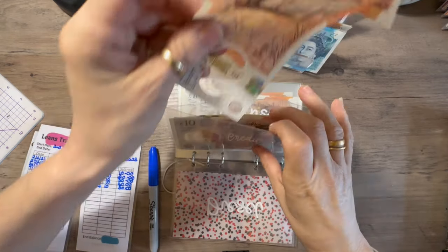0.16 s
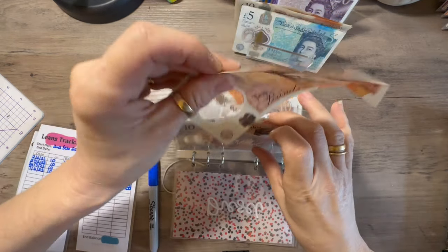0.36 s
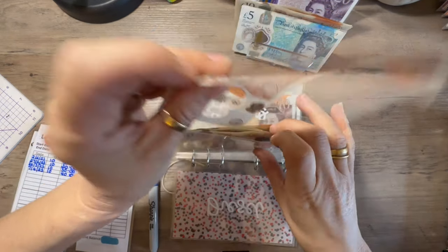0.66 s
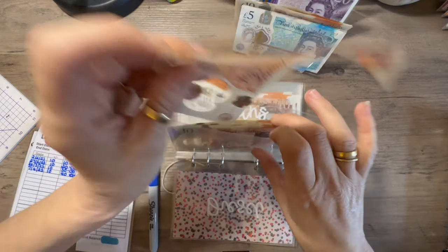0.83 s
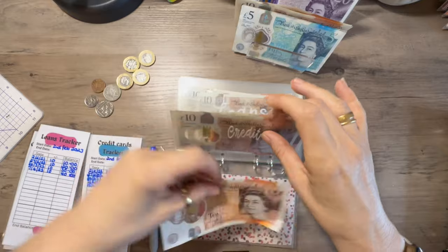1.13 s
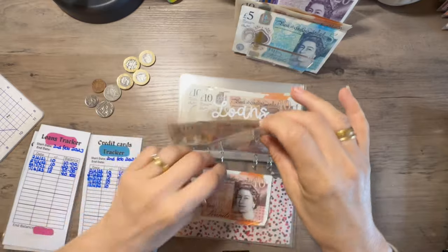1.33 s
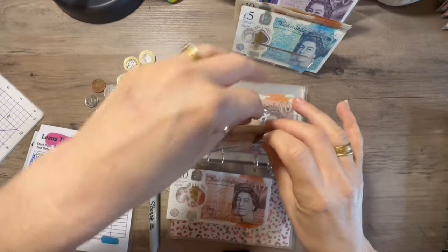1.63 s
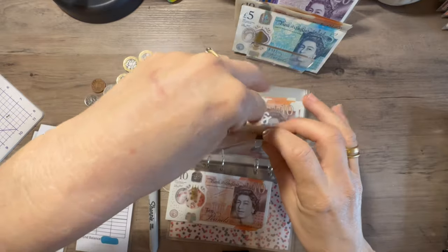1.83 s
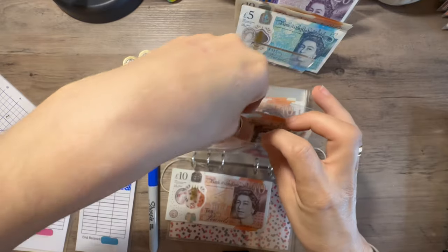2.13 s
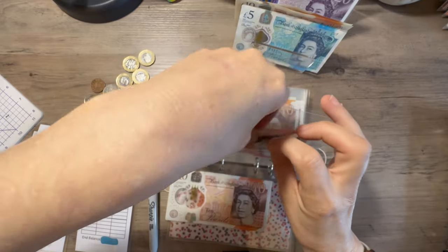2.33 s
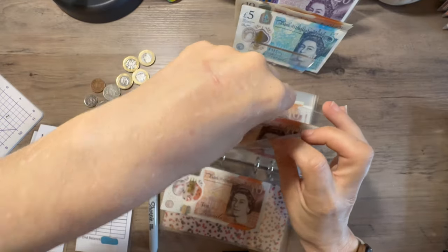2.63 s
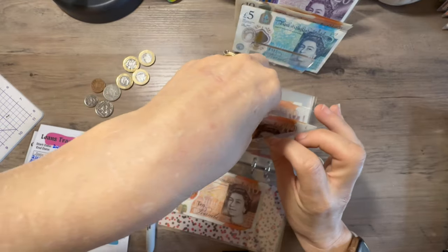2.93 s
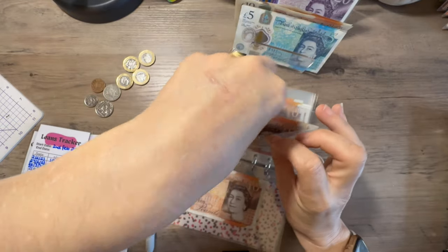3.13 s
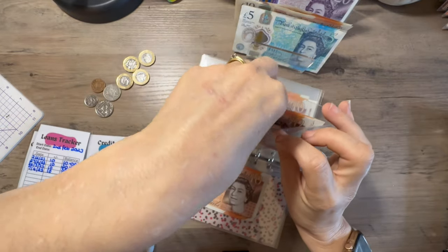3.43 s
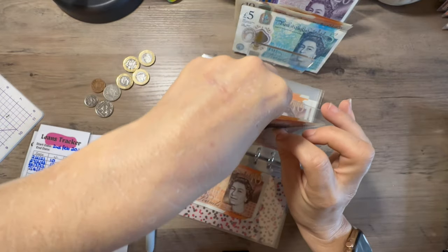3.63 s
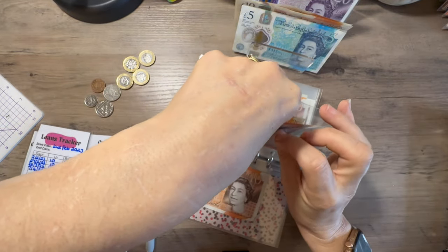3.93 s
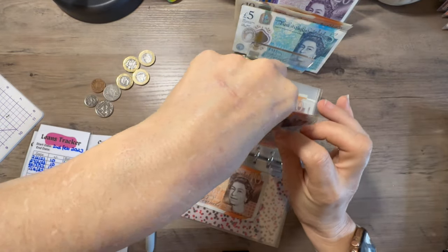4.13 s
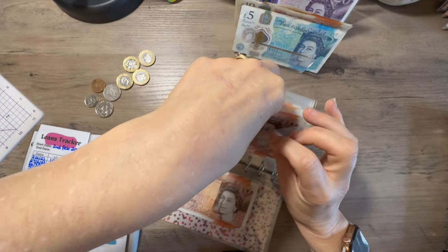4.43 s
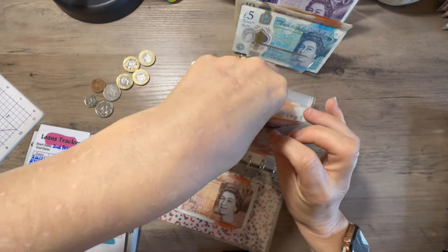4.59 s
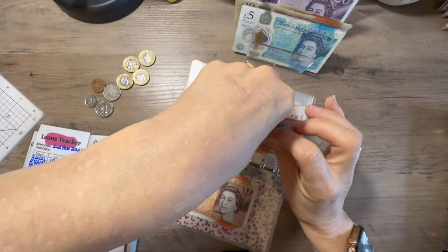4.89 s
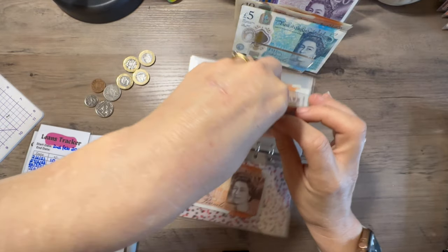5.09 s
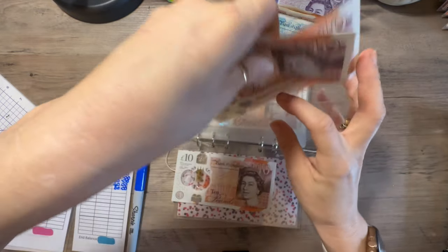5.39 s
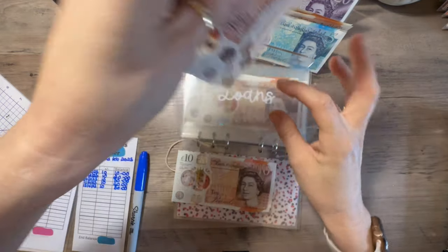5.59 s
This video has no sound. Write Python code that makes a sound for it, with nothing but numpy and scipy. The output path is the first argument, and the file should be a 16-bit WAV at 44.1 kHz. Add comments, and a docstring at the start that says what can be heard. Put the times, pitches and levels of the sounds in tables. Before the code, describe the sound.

Hands slide plastic notes from a clear pocket: soft crackly rustling, sharp little ticks, film snaps and faint low table thuds in a quiet room.

```python
"""In a small, quiet room, close to a stereo microphone, plastic banknotes are handled over a wooden table.
One is laid down, then fingers dig the next out of a clear binder pocket. Friction and buckling creases make
the film rustle; filtered noise bursts make its snaps, its crumpling and the ticks of nails and notes on the
binder. Taps run through the table top as a bending wave whose lows arrive late; low thuds are damped
swings. A faint hum wavers in the background noise."""
import sys
import numpy as np
from scipy import signal
from scipy.fft import rfft, irfft, next_fast_len
from scipy.io import wavfile
from scipy.ndimage import uniform_filter1d

SR = 44100
rng = np.random.default_rng(int(sys.argv[2]) if len(sys.argv) > 2 else 0)


def pcm_store(signal):
    """Save signal as 16-bit PCM."""
    levels = np.round(np.clip(np.atleast_2d(signal), -1, 1) * 32767)
    wavfile.write(sys.argv[1], SR, levels.astype(np.int16).T)


N = 253575
TIME = np.arange(N) / SR   # seconds
BURST_SIZE = 8192   # samples kept for one tap, crumple or thud
BURST_TIME = np.arange(BURST_SIZE) / SR   # seconds
EVENING_SIZE = 2205   # samples (50 ms) over which grainy signals are evened out

# Strokes of film sliding on film. Each row: peak in seconds, swell in seconds, fade in seconds,
# rustle level in dB, hiss in dB above the rustle, table rumble in dB above the rustle.
STROKES = [(0.003, 0.016, 0.04, -36.5, -15, -5), (0.057, 0.064, 0.24, -47.5, -6, -1.5),
           (0.425, 0.092, 0.19, -41.5, -7.5, -13), (0.533, 0.026, 0.086, -50, 7, -26),
           (0.73, 0.012, 0.04, -55.5, -12, -4.5), (0.989, 0.21, 0.2, -55, 0.5, 1.5),
           (1.215, 0.058, 0.15, -51, 0.5, -9), (1.301, 0.078, 0.042, -57.5, 9, 8),
           (1.596, 0.018, 0.12, -57, -14, 1.5), (1.72, 0.3, 0.46, -61, -9, -1),
           (2.185, 0.15, 0.09, -52.5, -2, 1), (2.315, 0.049, 0.3, -47, -8, 1.5),
           (2.665, 0.14, 0.12, -48, -8.5, 1), (2.834, 0.028, 0.12, -47.5, -8, 0.5),
           (3.014, 0.02, .12, -42, 4.5, -15), (3.18, 0.15, 0.3, -53, -12, 0.5),
           (3.418, 0.067, 0.089, -53, -7.5, 5), (3.535, 0.048, 0.3, -50.5, -7, -1),
           (3.81, 0.086, 0.53, -58, -9, 2.5), (3.986, 0.067, 0.19, -48.5, -2, -28),
           (4.109, 0.056, 0.16, -51, 3, -3), (4.401, 0.19, 0.22, -45, -12, -4),
           (4.47, 0.09, 0.19, -53.5, 3.5, 1.5), (4.7, 0.089, 0.26, -54.5, -7, -4.5),
           (5.11, .18, 0.12, -35, -11, -4.5), (5.192, 0.079, 0.41, -42, -4.5, -2.5),
           (5.288, 0.038, 0.029, -34, 2.5, -12), (5.466, 0.12, 0.052, -48.5, 11, -18),
           (5.48, 0.059, 0.42, -53, 5.5, 0.5), (5.74, 0.15, .1, -49, -17, 5)]
STROKE_DEPTH_DB, STROKE_SHAPE = 22, 1.167   # drop over one swell or fade time; 1 = pointed, 2 = bell-shaped
# The faint stir under the strokes: at first the hands only brush about, later the digging fingers hold the
# film. Each row: rustle level in dB, hiss level in dB, table rumble level in dB.
BRUSHING_DB = (-75, -81.5, -73)
HOLDING_DB = (-65.5, -94, -73)
HOLDING_FROM_S = 2.08

# Colours of the rustle, its hiss and the rumble it drives. Each row: frequency in Hz, relative density in dB.
CRINKLE_COLOUR = [(550, 1), (780, 6.5), (1020, 1.5), (1200, 0.5), (1480, 5), (1720, -.5), (2020, 1),
                  (3300, -1), (4300, -7.5), (5500, -20)]
HISS_COLOUR = [(3000, -7.5), (4600, 1), (6200, 2), (9500, -1.5), (12000, -4), (16000, -6)]
RUMBLE_COLOUR = [(30, -21), (55, 3.5), (160, 1), (790, 4), (1350, -27)]
# Likeness of the left and right sound. Each row: frequency in Hz, correlation from 0 to 1.
LIKENESS = [(100, 0.89), (900, 0.31), (1350, 0.97), (2100, 1), (2700, 0.44), (3900, 0.92), (5500, 0.15),
            (11500, 1)]

# Small ticks of nails and note edges: rate, level relative to the effort, greatest departure either way.
TICKS_PER_S, TICKS_DB, TICKS_SPREAD_DB = 30, -2.5, 4
# Resonances of the binder on the table. Each row: frequency in Hz, width in Hz, relative gain in dB.
BINDER_MODES = [(770, 48, 5.5), (1427, 78, 9.5), (1950, 89, 5.5)]

# Snaps of film and taps on the binder. Each row: start in seconds, table knock level in dB,
# pocket ring level in dB, ring pitch in Hz, film snap level in dB, upper band edge of the snap in Hz.
TAPS = [(0.0573, -40.5, -38, 2010, -51, 6400), (0.4812, -43, -54, 800, -65, 4970),
        (0.619, -48.5, -49.5, 696, -52.5, 7640), (1.052, -56, -51.5, 1120, -55.5, 7000),
        (1.1638, -50.5, -43, 2350, -40.5, 4520), (1.187, -70, -42, 2000, -38, 5530),
        (1.23, -44.5, -47, 1790, -52, 5900), (1.3695, -38, -44.5, 1490, -57, 8500),
        (1.5159, -39.5, -43, 1440, -52.5, 4360), (1.694, -45.5, -36.5, 1850, -61, 4200),
        (1.727, -50, -44, 2100, -42.5, 7760), (2.0856, -38, -26, 1510, -42, 6740),
        (2.145, -44, -33.5, 2000, -44, 6040), (2.181, -44.5, -45.5, 1730, -66, 6900),
        (2.297, -47, -41.5, 1540, -57, 5400), (2.4363, -45.5, -46, 1920, -52, 5500),
        (2.5959, -44, -36.5, 1400, -58, 4750), (2.65, -56, -36.5, 1470, -63, 5600),
        (2.6664, -57, -33.5, 1430, -53, 6600), (2.6766, -68, -38.5, 1450, -59, 7300),
        (2.7044, -45, -38.5, 1420, -57, 6300), (3.042, -34.5, -26.5, 1400, -25.5, 11700),
        (3.079, -46, -44, 1335, -45, 9000), (3.0884, -47, -42, 765, -41, 13000),
        (3.4757, -31, -33, 2010, -47, 4380), (3.52, -51, -45.5, 1440, -61, 6000),
        (3.5399, -66, -54, 1450, -40, 14500), (3.7888, -40, -33, 1950, -41, 5740),
        (3.9385, -60, -45.5, 1460, -44, 6340), (4.0978, -34.5, -32.5, 1350, -37, 10400),
        (4.122, -58, -46, 2030, -50, 7000), (4.305, -46, -45.5, 1320, -49, 8000),
        (4.349, -55, -42, 1330, -55, 6000), (4.4525, -36, -31, 1450, -29, 7700),
        (4.5174, -41.5, -31.5, 1460, -24.5, 9700), (4.7709, -48, -45, 1460, -56, 6100),
        (4.9465, -41, -37, 1420, -62, 3700), (5.069, -38, -49, 860, -62, 4530),
        (5.1849, -35.5, -39, 2780, -39, 4800), (5.2946, -65, -34, 2050, -38, 9300),
        (5.342, -41, -55, 800, -50, 6000), (5.7029, -48, -61, 1450, -43, 14200)]
# Short runs of creases as the film crumples. Each row: start in seconds, length in seconds,
# film level in dB, film centre in Hz, binder level in dB.
CRUMPLES = [(0.043, 0.015, -42.5, 5700, -47), (0.079, 0.024, -42, 3270, -40.5),
            (0.133, 0.0057, -51.5, 3240, -45.5), (0.164, 0.007, -50, 3400, -46.5),
            (0.191, 0.0057, -51, 4850, -51), (0.342, 0.02, -58, 4500, -54), (0.99, 0.015, -48, 8000, -52),
            (1.095, 0.0081, -53, 8400, -57.5), (1.227, 0.012, -52, 3000, -47),
            (1.301, 0.0038, -43.5, 9500, -58), (2.283, 0.0086, -48, 3270, -43),
            (2.347, 0.015, -40.5, 5300, -42.5), (2.389, 0.0067, -43.5, 7200, -42.5),
            (2.592, 0.011, -54, 3000, -35.5), (2.82, 0.016, -51, 3460, -43), (3.04, 0.0018, -30, 6560, -41),
            (3.617, 0.0055, -50, 3920, -49), (3.664, 0.013, -43, 3400, -45.5),
            (5.094, 0.014, -37.5, 3470, -41), (5.177, 0.019, -34, 3620, -36.5)]
# A note's edge scraping along the pocket. Each row: start in seconds, length in seconds,
# first frequency in Hz, last frequency in Hz, level in dB.
SCRAPES = [(3.12, .1, 1150, 790, -50), (3.155, .12, 2200, 2780, -58), (3.15, .065, 3560, 3470, -57),
           (3.96, .09, 1430, 1500, -51), (3.965, .07, 3350, 3200, -54), (5.71, .06, 780, 720, -47)]
# Low thuds of the table as it is knocked or pressed. Each row: time in seconds, level in dB,
# settled pitch in Hz.
THUDS = [(0.675, -50.5, 198), (0.877, -42, 131), (1.261, -47, 131), (1.314, -42, 162), (1.381, -43, 125),
         (1.596, -44, 85), (1.699, -34, 98), (1.884, -44.5, 134), (3.049, -42.5, 131), (3.412, -42, 136),
         (3.801, -45.5, 122), (4.423, -40.5, 147), (5.107, -39.5, 166), (5.201, -39.5, 130),
         (5.519, -43, 130)]

# Colour of the quiet room. Each row: frequency in Hz, relative density in dB.
ROOM_COLOUR = [(20, -12), (55, 7.5), (100, 5), (260, -9), (400, -29), (3000, -33), (16000, -63)]
ROOM_TONE_DB, HUM_HZ, HUM_DB = -62.5, 254.4, -69.5
# The two microphone ports hear the treble out of step. Each row: frequency in Hz, lag of the left in radians.
PORT_LAG = [(4400, 0), (9000, 1.5), (11600, 3.0), (15500, 4.3)]
CUTOFF_HZ = 16100


def rustle():
    """Friction: slips and buckling creases crinkle the film, hiss at its edges and shake the table."""
    sliding, hissing, pressure = stroke_levels()
    grain = slips(per_s=380, size_db=3.6, smooth=.35, settle_s=.0012)
    creases = crackles(1700, 700, 5200, size_db=3.4, decay_s=.0012)
    crinkle = grain * rng.standard_normal((2, N)) + from_db(3.5) * creases * np.sqrt(grain)
    crinkle = spread(among_hands(crinkle, path_s=0.000793, echo=0.58), CRINKLE_COLOUR)

    fine_creases = crackles(2000, 3870, 14760, size_db=4.5, decay_s=0.0031)
    hiss = np.sqrt(grain) * rng.standard_normal((2, N)) + from_db(-9.5) * fine_creases
    hiss = spread(among_hands(hiss, path_s=.0005, echo=0.78), HISS_COLOUR)

    # fingertips bump and drag on the binder; the table carries it
    bumps = crackles(160, 100, 700, size_db=3, decay_s=.0005)
    drag = 1.8 * rng.standard_normal((2, N))
    rumble = table_wave(spread(bumps + drag, RUMBLE_COLOUR))
    film = sliding * crinkle + hissing * hiss
    return film + pressure * rumble + ticks(np.sqrt(pressure * sliding))


def stroke_levels():
    """Power addition: strokes swell and fade over a faint stir; gives gains of rustle, hiss and rumble."""
    holding = TIME > HOLDING_FROM_S
    stir = np.where(holding, from_db(HOLDING_DB)[:, None], from_db(BRUSHING_DB)[:, None])
    power = stir ** 2
    for s, swell_s, fade_s, level_db, hiss_db, rumble_db in STROKES:
        away = np.maximum((s - TIME) / swell_s, (TIME - s) / fade_s)
        drop_db = STROKE_DEPTH_DB * np.minimum(abs(away), 10) ** STROKE_SHAPE
        envelope = from_db(level_db - drop_db)
        power = power + np.outer(from_db([0, hiss_db, rumble_db]), envelope) ** 2
    return np.sqrt(power)


def slips(per_s, size_db, smooth, settle_s):
    """Stick and slip: the envelope of tiny uneven bursts over a smooth share of friction."""
    strength = from_db(size_db * np.minimum(rng.exponential(1, N), 4))
    sizes = strength * (rng.random(N) < per_s / SR)
    power = signal.lfilter([1], [1, -np.exp(-2 / (settle_s * SR))], sizes ** 2 + 1e-18)
    power = power / power.mean() + abs(smooth)
    return np.sqrt(power / uniform_filter1d(power, size=EVENING_SIZE))


def crackles(per_s, low_hz, high_hz, size_db, decay_s, size=512):
    """Buckling: random damped rings, each with its own pitch, strength and phase at each port; evened out."""
    chances = rng.random((int(per_s * TIME[-1]), 5))
    when, pitch, strength, left, right = chances.T[:, :, None]
    t = np.arange(size) / SR
    turn = 2 * np.pi * (low_hz + pitch * (high_hz - low_hz)) * t
    exponential = np.minimum(-np.log(1 - strength), 3.5)
    envelope = from_db(size_db * exponential) * np.exp(-t / decay_s)
    at = ((when * N).astype(int) + np.arange(size)).ravel()
    pair = []
    for phase in (left, right):
        rings = envelope * np.sin(turn + 2 * np.pi * phase)
        pair.append(np.bincount(at, rings.ravel(), N)[:N])
    pair = np.array(pair)
    return pair / np.sqrt(uniform_filter1d(np.mean(pair ** 2, axis=0), size=EVENING_SIZE) + 1e-6)


def among_hands(x, path_s, echo, count=3):
    """Interference: reflections off the moving hands and sheets give the film a shifting colour."""
    out = x
    for k in range(count):
        delay_s = path_s * (k + 1) * np.exp(0.2246 * drift(1.29))
        reflected = np.array([np.interp(TIME - delay_s, TIME, side) for side in x])
        out = out + echo * (-1) ** k * reflected
    return out


def spread(pair, colour):
    """Coherence: two unrelated signals become coloured and partly alike left and right; rms 1."""
    size = next_fast_len(N + BURST_SIZE)
    mid, side = rfft(pair, size) * from_db(over_hz(colour, size))
    alike = np.clip(over_hz(LIKENESS, size), 0, 1)
    ports = np.sqrt(1 + alike) * mid + np.sqrt(1 - alike) * side * [[1], [-1]]
    return rms_one(irfft(ports, size)[:, :N])


def ticks(effort):
    """Impulse excitation: random catches strike the binder, harder the more the fingers press and slide."""
    level_db = TICKS_DB + TICKS_SPREAD_DB * (2 * rng.random(N) - 1)
    clicks = (rng.random(N) < TICKS_PER_S / SR) * from_db(level_db) * effort
    push = contact(scatter_s=.0016, scatter_db=-3, tail_s=.01, tail_db=-12, apart=.3)
    ring = sum(from_db(db) * resonate(push, hz, width) for hz, width, db in BINDER_MODES)
    ring = ring + from_db(-12) * band(push, 900, 5000)
    return table_wave(signal.fftconvolve(clicks[None], burst_one(ring), axes=1)[:, :N])


def taps():
    """Two paths: the snap crosses the air; the ring of pocket and binder and the knock follow by the table."""
    air, wood = np.zeros((2, 2, N))
    for s, knock_db, ring_db, pitch_hz, snap_db, top_hz in TAPS:
        snap = contact(scatter_s=.0018, scatter_db=6, tail_s=.009, tail_db=-3, apart=.4)
        snap = band(snap, 2200, top_hz)
        film_hz = 3300 * np.exp(.18 * rng.standard_normal())
        snap = snap + 1.8 * resonate(snap, film_hz, 420)
        add(air, from_db(snap_db) * burst_one(snap), s + 0.00032)

        push = contact(scatter_s=.0016, scatter_db=-3.5, tail_s=.01, tail_db=-12, apart=.17)
        # the free span of the pocket, and so its pitch, differs from tap to tap
        ring = from_db(12) * resonate(push, pitch_hz, 170) + band(push, 950, 1980)
        for hz, width_hz, db in BINDER_MODES:
            mode_db = db + 2 * rng.standard_normal() - 1
            ring = ring + from_db(mode_db) * resonate(push, hz, width_hz)
        knock = contact(scatter_s=0.0056, scatter_db=-1.5, tail_s=0.026, tail_db=-5.5, apart=0.63)
        knock = band(knock, 140, 840)
        add(wood, from_db(ring_db) * burst_one(ring) + from_db(knock_db) * burst_one(knock), s)
    return air + np.roll(table_wave(wood), -round(.0005 * SR), axis=1)


def contact(scatter_s, scatter_db, tail_s, tail_db, apart):
    """Impact: a click, scattered reflections from near edges and a tail, partly different at each port."""
    shared, left, right = rng.standard_normal((3, BURST_SIZE))
    noise = shared + apart * np.array([left, right])
    click = burst_one(np.tile(BURST_TIME == 0, (2, 1)) * 1.)
    scatter = from_db(scatter_db) * burst_one(noise * np.exp(-BURST_TIME / scatter_s))
    tail = from_db(tail_db) * burst_one(noise * np.exp(-BURST_TIME / tail_s))
    return click + scatter + tail


def table_wave(x, delay_s=0.0016, slope=0.8):
    """Dispersion: bending waves are slower the lower they are; delay_s is the travel time at 1 kHz."""
    size = next_fast_len(N + BURST_SIZE)
    hz = np.maximum(np.fft.rfftfreq(size, 1 / SR), 80)
    delay = delay_s * (1000 / hz) ** slope
    # summing the delay over frequency gives the phase
    phase = 2 * np.pi * np.cumsum(delay) * SR / size
    return irfft(rfft(x, size) * np.exp(-1j * phase), size)[:, :N]


def crumples(width=0.22, body_db=-4, judder_db=4):
    """Buckling: a fold gives way over milliseconds, rings at its own pitch and rattles the binder."""
    out, t = np.zeros((2, N)), BURST_TIME
    for s, length, film_db, centre_hz, binder_db in CRUMPLES:
        envelope = (1 - np.exp(-t / 0.00048)) * np.exp(-np.maximum(t - 0.68 * length, 0) / 0.0046)
        judder = from_db(judder_db * drift(540)[:BURST_SIZE])
        shared, left, right = rng.standard_normal((3, BURST_SIZE))
        run = (shared + 0.42 * np.array([left, right])) * envelope * judder
        film = resonate(band(run, 1300, CUTOFF_HZ), centre_hz, width * centre_hz)
        film = film + from_db(body_db) * band(run, 1800, 2 * centre_hz)
        ring = band(run, 1256, 2200, order=3)
        add(out, from_db(film_db) * burst_one(film) + from_db(binder_db) * burst_one(ring), s)
    return out


def scrapes(drift_hz=130):
    """Stick and slip: a juddering edge excites a squeak that glides as the free length of film changes."""
    out = np.zeros((2, N))
    judder = slips(per_s=570, size_db=4.5, smooth=0.21, settle_s=0.0033)
    for s, length, first_hz, last_hz, db in SCRAPES:
        size = int(length * SR)
        turn = 2 * np.pi * np.cumsum(np.geomspace(first_hz, last_hz, size)) / SR
        # two slow chances on cosine and sine make a narrow band of noise
        squeak = drift(drift_hz)[:size] * np.cos(turn) + drift(drift_hz)[:size] * np.sin(turn)
        rasp = squeak * judder[:size] * signal.windows.tukey(size, .5)
        add(out, from_db(db) * rms_one(rasp)[None], s)
    return out


def thuds(glide=1.7, glide_s=0.0046, wobble=0.11, rise_cycles=1.25):
    """Damped oscillation: a few uneven swings of the table fall in pitch as the slower lows arrive."""
    out, t = np.zeros((2, N)), BURST_TIME
    for s, level_db, hz in THUDS:
        swell = (t * np.exp(-t * hz / rise_cycles)) ** 2
        turns = hz * (t - glide * glide_s * np.exp(-t / glide_s))
        turns = turns + rng.random() + wobble * drift(hz)[:BURST_SIZE]
        swings = np.sin(2 * np.pi * turns) * swell / swell.max()
        add(out, from_db(level_db) * swings[None], s - .003)
    return out


def room(x, t60=0.22, wet_db=-18, top_hz=7500, echo_db=-15, count=7):
    """Reverberation: early echoes from things on the table and the wall, and a short diffuse tail."""
    t = np.arange(SR // 2) / SR
    tail = rng.standard_normal((2, len(t))) * from_db(-60 * t / t60) * (t > .008)
    response = from_db(wet_db) * tail / np.sqrt(np.sum(tail ** 2) / 2)
    for side in response:
        at = (rng.uniform(.002, .011, count) * SR).astype(int)
        side[at] += from_db(echo_db) * rng.choice([-1, 1], count) / np.sqrt(count)
    return signal.fftconvolve(x, band(response, 118, top_hz, order=3), axes=1)[:, :N]


def room_tone():
    """Stationary noise: a low coloured background with a faint hum of wavering frequency."""
    noise = spread(rng.standard_normal((2, N)), ROOM_COLOUR)
    hum = np.sin(2 * np.pi * np.cumsum(HUM_HZ + 3 * drift(7.9)) / SR) * np.sqrt(2)
    return from_db(ROOM_TONE_DB) * noise + from_db(HUM_DB) * hum


def from_db(db):
    """Logarithmic level: decibels to amplitude gain."""
    return 10 ** (np.asarray(db) / 20)


def rms_one(x):
    """Mean power: scale to rms 1."""
    return x / np.sqrt(np.mean(x ** 2) + 1e-20)


def burst_one(x):
    """Burst energy: scale a short stereo burst to the energy of 10 ms at rms 1."""
    return x / np.sqrt(np.sum(x ** 2) / 2 / (.01 * SR) + 1e-20)


def over_hz(points, size):
    """Logarithmic frequency: a table of (Hz, value) is interpolated at the bins of a transform."""
    hz, value = np.transpose(points)
    return np.interp(np.log(np.fft.rfftfreq(size, 1 / SR) + 1e-3), np.log(hz), value)


def band(x, low_hz, high_hz, order=2):
    """Band limiting: a causal band-pass."""
    high_hz = np.clip(high_hz, low_hz + 20, SR / 2 - 20)
    sos = signal.butter(order, [low_hz, high_hz], "band", fs=SR, output="sos")
    return signal.sosfilt(sos, x + 1e-18)


def resonate(x, hz, width_hz):
    """Resonance: one damped mode with gain close to 1 at its peak."""
    r = np.exp(-np.pi * width_hz / SR)
    feed = np.array([1, 0, -1]) * (1 - r * r) / 2
    return signal.lfilter(feed, [1, -2 * r * np.cos(2 * np.pi * hz / SR), r * r], x + 1e-18)


def drift(rate_hz):
    """Random modulation: noise low-passed twice at rate_hz, made on every 40th sample, with spread 1."""
    r, settling = np.exp(-80 * np.pi * rate_hz / SR), 2000
    noise = rng.standard_normal(N // 40 + settling + 2)
    slow = signal.lfilter([1], [1, -2 * r, r * r], noise)[settling:]
    return np.interp(np.arange(N) / 40, np.arange(len(slow)), rms_one(slow))


def add(out, x, s):
    """Superposition: mix x into out from second s on."""
    at = max(round(s * SR), 0)
    out[:, at:at + x.shape[1]] += x[:, :N - at]


def scene():
    """Superposition: everything the hands do, its reverberation and the background."""
    handling = rustle() + scrapes() + taps() + crumples() + thuds()
    return handling + room(handling) + room_tone()


def record(dry):
    """Port response: both ports ring in the top octave, the left lags in the treble; the top is cut."""
    size = next_fast_len(N + BURST_SIZE)
    dry = dry + 0.4 * resonate(dry, 14800, 1000)
    left = irfft(rfft(dry[0], size) * np.exp(-1j * over_hz(PORT_LAG, size)), size)[:N]
    low_pass = signal.ellip(10, .1, 80, CUTOFF_HZ, fs=SR, output="sos")
    return signal.sosfilt(low_pass, [left, dry[1]])


dry = scene()
out = record(dry)
pcm_store(out)
```